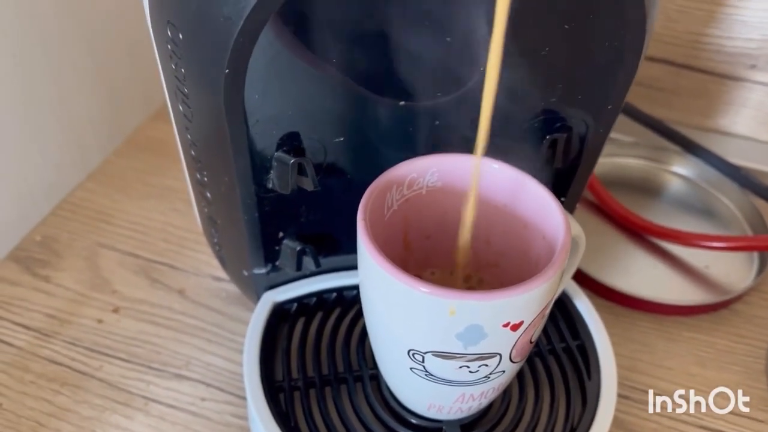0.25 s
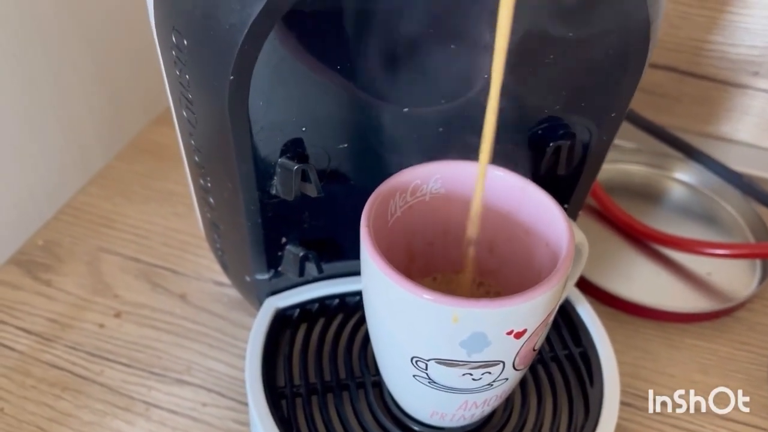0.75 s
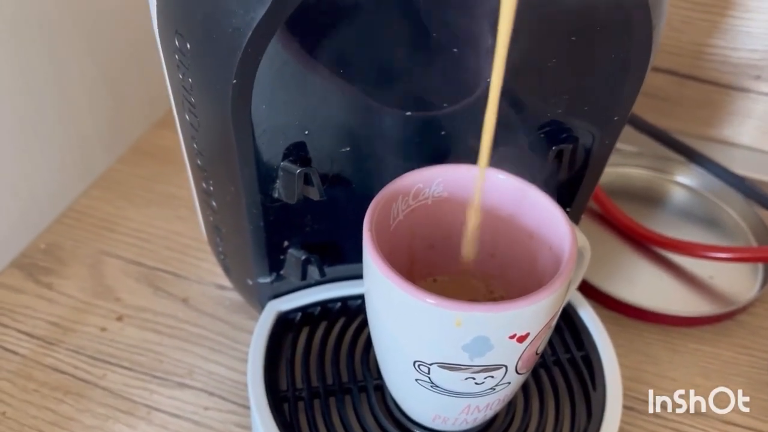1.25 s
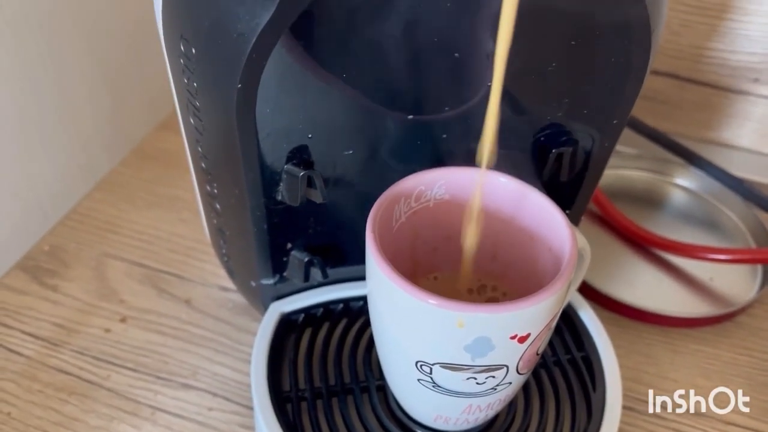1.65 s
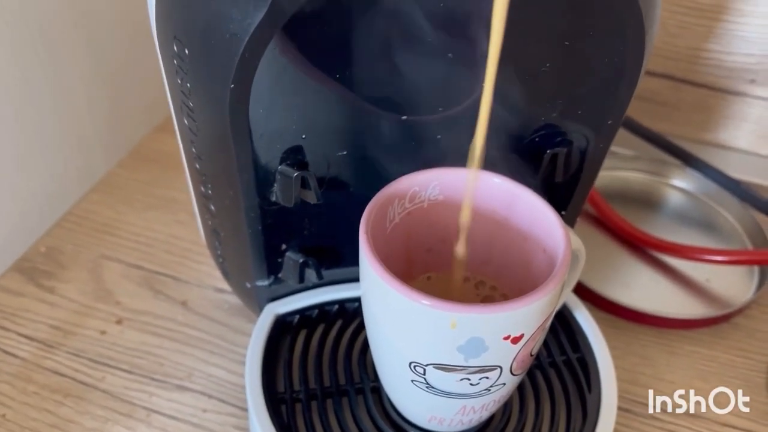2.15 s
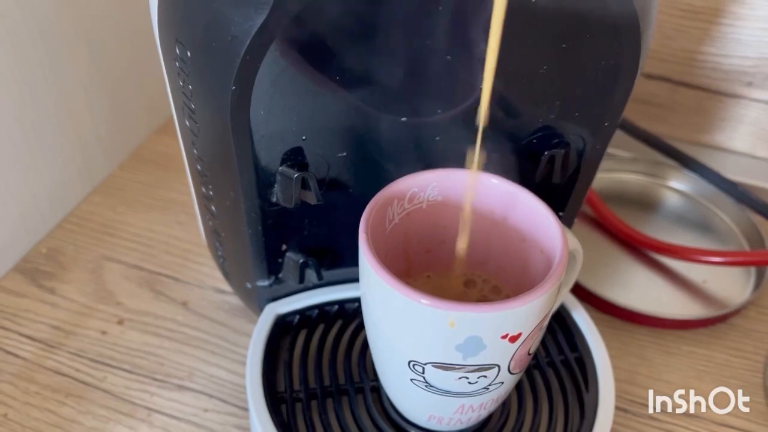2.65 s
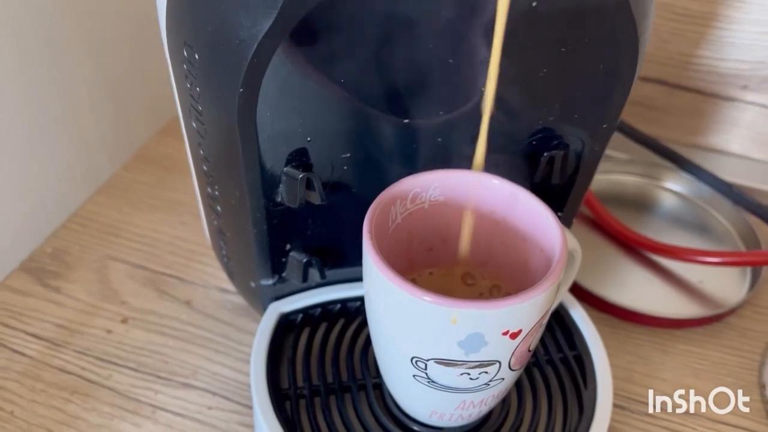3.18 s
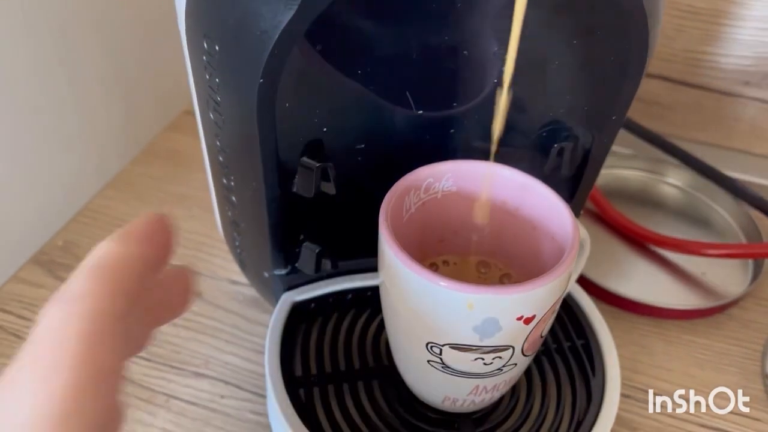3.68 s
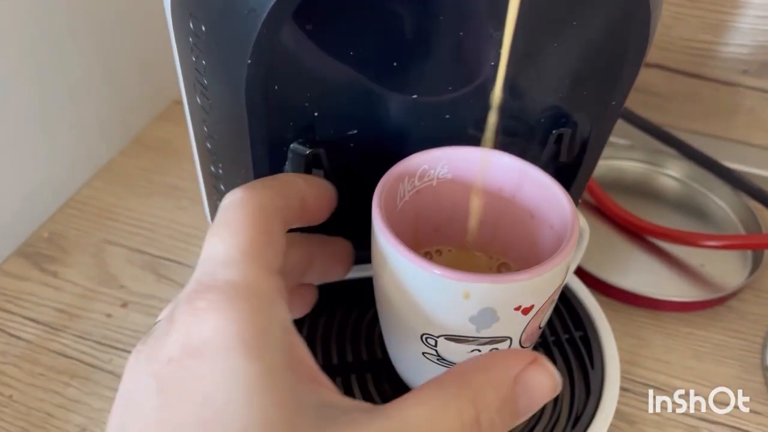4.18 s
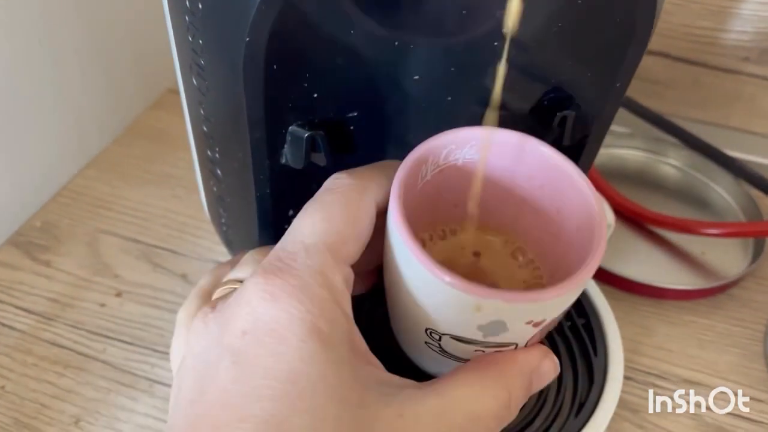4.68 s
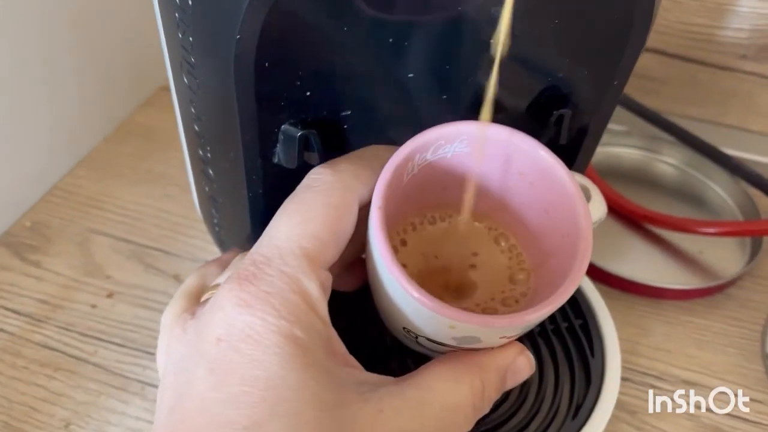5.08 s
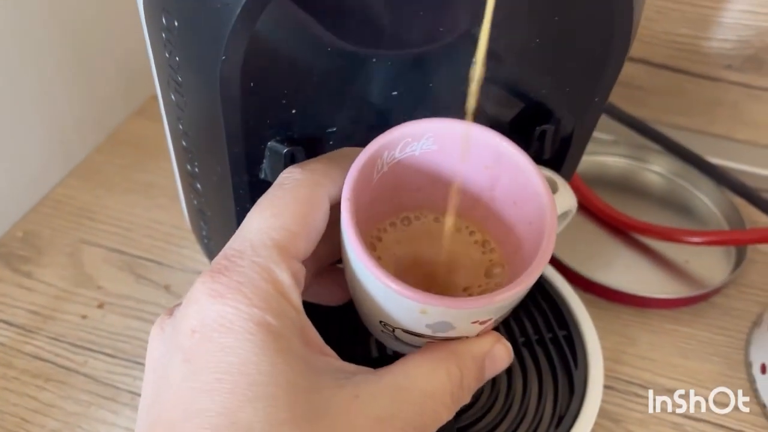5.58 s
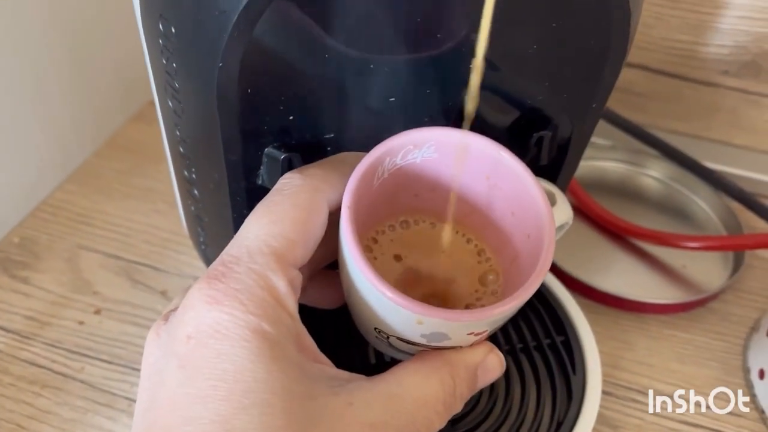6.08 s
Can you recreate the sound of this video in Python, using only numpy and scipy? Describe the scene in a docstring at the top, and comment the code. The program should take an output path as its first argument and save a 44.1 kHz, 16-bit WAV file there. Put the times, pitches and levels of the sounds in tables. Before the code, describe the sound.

A low, buzzing coffee pump runs for a second and a half, bubbles popping through it, then cuts off. Irregular hollow plops and fizz continue; a chattering valve knock lands near two seconds. Later a faint soft swish passes, a mug slides and thuds dully on its tray, and the drips die down. Close stereo microphone, short room echo.

```python
"""A capsule coffee machine fills a mug. A solenoid pump hums and rattles at mains rate until 1.54 s: harmonics
plus stroke-shaped noise. Bubbles burst at the spout throughout, kicks into resonances, over rumble and fizz;
after the pump stops, small bubbles and froth join them. A valve knocks near 2 s, slugs of coffee rock the tray,
a soft swish peaks at 3.2 s, and from 4.6 s a hand shifts the mug: noise scrapes and decaying sine bumps.
A small room answers, heard through two microphone ports."""
import sys
import numpy as np
from scipy import signal
from scipy.fft import rfft, irfft, next_fast_len
from scipy.io import wavfile
from scipy.ndimage import map_coordinates

SR = 44100
rng = np.random.default_rng(int(sys.argv[2]) if len(sys.argv) > 2 else 0)


def output_pcm(signal):
    """Save a mono or channel-first signal as 16-bit PCM at the path in sys.argv[1].

    Samples are clipped to [-1, 1] before scaling.
    """
    pcm = np.clip(np.atleast_2d(signal).T, -1, 1) * 32767
    wavfile.write(sys.argv[1], SR, np.round(pcm).astype(np.int16))


N = 279579
TIME_S = np.arange(N) / SR


def amp(db):
    """Decibels to gain."""
    return 10 ** (np.asarray(db) / 20)


def unit(x):
    """Scale to rms 1."""
    return x / np.sqrt(np.mean(x ** 2) + 1e-20)


def noise():
    """White noise for the whole scene."""
    return rng.standard_normal(N)


def along(points, hz):
    """Interpolate (Hz, value) points on a log frequency axis."""
    f, v = np.transpose(points)
    return np.interp(np.log(hz + 1), np.log(f + 1), v)


def curves(rows):
    """One value per sample for each column after the time."""
    s, *columns = np.transpose(rows)
    return [np.interp(TIME_S, s, column) for column in columns]


def wobble(rate_hz):
    """A smooth random curve with rate_hz knots a second."""
    steps = np.arange(0, N + 64, 64)
    knots = rng.standard_normal(int(N * rate_hz / SR) + 4)
    return np.interp(np.arange(N), steps, map_coordinates(knots, [steps * rate_hz / SR]))


def filtered(x, response):
    """x times a complex response of frequency."""
    n = x.shape[-1]
    m = next_fast_len(n + min(n // 2, SR // 10), True)
    return irfft(rfft(x, m) * response(np.fft.rfftfreq(m, 1 / SR)), m)[..., :n]


def coloured(x, spectrum):
    """x shaped by (Hz, dB) points, at rms 1."""
    return unit(filtered(x, lambda hz: amp(along(spectrum, hz))))


def resonate(x, modes):
    """x through parallel causal resonances of alternating sign, at rms 1."""
    def response(hz):
        total = 0
        for k, (centre_hz, width_hz, db) in enumerate(modes):
            damping = 1j * hz * width_hz
            total = total + (-1) ** k * amp(db) * damping / (centre_hz ** 2 - hz ** 2 + damping)
        return total
    return unit(filtered(x, response))


def add(track, s, sound):
    """Mix a sound into the track at time s."""
    part = track[max(round(s * SR), 0):][:len(sound)]
    part += sound[:len(part)]


def grains(rate_hz, spread_db):
    """Random clicks, rate_hz a second, a few much larger than the rest."""
    size = np.minimum(rng.standard_normal(N), 2.3)
    return (rng.random(N) < rate_hz / SR) * rng.choice([-1, 1], N) * amp(spread_db * size)


def swell(s, attack_s, hold_s, release_s, db):
    """A gain that rises 20 dB per attack up to time s and falls 20 dB per release from s + hold."""
    t = TIME_S - s
    return amp(db - 20 * (np.maximum(-t, 0) / attack_s + np.maximum(t - hold_s, 0) / release_s))


# Quiet kitchen spectrum. Each row: frequency in Hz, relative level in dB.
AIR_SPECTRUM = [(25, 0.5), (60, 13), (125, 12), (175, 13), (230, 7), (360, -4.5), (550, -24.5),
                (1000, -37.5), (1700, -24.5), (3000, -18.5)]


def kitchen_air():
    """Steady noise, nearly all of it low."""
    return amp(-67.5) * coloured(noise(), AIR_SPECTRUM)


MAINS_HZ, FIRST_STROKE_S, PUMP_OFF_S = 50, .019, 1.538
PERIOD_S = 1 / MAINS_HZ
TURNS = (TIME_S - FIRST_STROKE_S) * MAINS_HZ
CYCLE = TURNS[:SR // MAINS_HZ]  # one stroke, in turns
SINCE_S = CYCLE % 1 * PERIOD_S  # time since the stroke

# Hum partials. Each row: multiple of the stroke rate, relative level in dB.
HUM_PARTIALS = [(1, -3), (2, 1.5), (3, -14), (4, -14), (5, 2), (6, -6.5), (7, 1), (8, -6.5), (9, -21),
                (11, -17.5), (13, -21.5), (14, -24.5), (15, -18.5), (16, -19.5), (17, -18), (18, -13.5),
                (19, -22.5), (20, -12), (21, -16), (22, -17), (24, -16.5), (25, -17.5), (26, -20),
                (27, -18)]
# Case smears the low partials most. Each row: frequency in Hz, phase scatter factor in radians.
PHASE_SMEAR = [(400, 4.44), (550, 1.34), (1400, 1)]
# The piston's first blow in the cycle, then the second: delay after it and strength.
STRIKE_S, REBOUND_S, REBOUND_GAIN = 0.001033, .0047, 0.99


def hum():
    """Two blows per cycle set the partials going; paths through the case smear their phases."""
    shape = 0
    for k, db in HUM_PARTIALS:
        hz = k * MAINS_HZ
        two_blows = 1 + REBOUND_GAIN * np.exp(-2j * np.pi * hz * REBOUND_S)
        lead = np.angle(two_blows) - 2 * np.pi * hz * STRIKE_S
        smear = along(PHASE_SMEAR, hz) * rng.uniform(-1.1, 1)
        shape = shape + amp(db) * np.cos(2 * np.pi * k * CYCLE + lead + smear)
    return np.resize(unit(shape), N) * amp(0.57 * wobble(3))


# Half-order lines. Each row: multiple of the stroke rate, relative level in dB.
HALF_ORDERS = [(3.5, -3), (4.5, 3), (5.5, 0)]


def half_orders():
    """Alternate strokes differ slightly, which puts faint lines between the harmonics."""
    return sum(amp(db + 4.5 * wobble(8.5)) * np.sin(2 * np.pi * k * TURNS) for k, db in HALF_ORDERS)


# Water in the pump. Each row: frequency in Hz, relative level in dB.
CHURN_SPECTRUM = [(40, -29), (80, 0), (130, -16), (170, -12), (220, -16), (380, -10), (480, -14.5),
                  (900, -57)]


def churn():
    """Water churns in the pump as low noise."""
    return coloured(noise(), CHURN_SPECTRUM)


def blows():
    """The piston hits its stop, then springs back a few milliseconds later: one cycle's envelope."""
    spring_back = 0.14 * np.exp(-((SINCE_S - .004) % PERIOD_S) / 0.0075)
    return np.exp(-SINCE_S / 0.0056) + spring_back + 0.36


# Tight panels. Each row: frequency in Hz, relative level in dB.
BUZZ_SPECTRUM = [(1200, -31), (1600, 7.5), (1850, 1.5), (2100, -6), (2400, -2), (3200, -10), (4400, -8),
                 (6000, -9.5), (8300, -21), (12000, -16), (16000, -26)]


def panel_buzz():
    """Tight panels repeat the same noise on every stroke, with a wavering level."""
    stroke = rng.standard_normal(len(CYCLE)) * blows()
    return coloured(np.resize(stroke, N), BUZZ_SPECTRUM) * amp(1.6 * wobble(40.06))


# Case shaken by the piston. Each row: frequency in Hz, relative level in dB.
RATTLE_SPECTRUM = [(450, -11), (600, -5), (800, -10), (1040, 3.5), (1170, -2), (1300, 1), (1800, 2),
                   (2100, -16), (2500, -10), (3200, -22), (4400, -24.5), (7000, -19), (12000, -28),
                   (15500, -41)]
# Air passing through the pump. Each row: time in seconds, rattle rise in dB, half length in seconds.
GURGLES = [(0.238, 0, 0.014), (0.606, 2.5, 0.043), (0.8, 2.5, 0.0105), (0.985, 1, 0.018), (1.29, 0, 0.016)]


def case_rattle():
    """Loose panels rattle anew on each stroke, louder as air passes through the pump."""
    gurgle_db = sum(db * np.exp(-((TIME_S - s) / half_s) ** 2) for s, db, half_s in GURGLES)
    strokes = noise() * np.resize(blows(), N) * amp(2.5 * wobble(50))
    return coloured(strokes, RATTLE_SPECTRUM) * amp(gurgle_db)


# Squirted water. Each row: frequency in Hz, relative level in dB.
SQUIRT_SPECTRUM = [(2000, 7), (3600, 6), (4400, 16), (5100, -7), (5800, 18), (6100, 2), (7000, 7),
                   (8300, -12.5), (10000, -4), (13500, 9), (16000, -11)]
# Sizzling grains. Each row: frequency in Hz, relative level in dB.
SIZZLE_SPECTRUM = [(2000, -35), (6000, 5), (10000, 4), (14000, -11), (16000, -20)]


def flow_hiss():
    """Each stroke squirts a pulse of noise; random grains sizzle over it."""
    pulse = np.exp(-(((SINCE_S + 0.0018) % PERIOD_S - .002) / 0.0018) ** 2)
    squirt = coloured(np.resize(0.32 + pulse, N) * noise(), SQUIRT_SPECTRUM)
    return squirt + 0.5 * coloured(grains(rate_hz=330, spread_db=15), SIZZLE_SPECTRUM)


# Pump levels before mix trims. Each row: time in seconds, rattle in dB, flow hiss in dB.
PUMP_LEVELS = [(0.0, -40.5, -49.5), (1.032, -40.5, -48), (1.34, -40.5, -53), (1.398, -39.5, -49),
               (1.5, -41.5, -52)]
# Swing on rubber mounts. Each row: frequency in Hz, level in dB, t60 in seconds.
MOUNTS = [(69.8, -35.5, 0.5), (96.4, -32, .4)]


def pump():
    """The piston strikes each mains cycle; at cut-out the pump swings out on its rubber mounts."""
    rattle_db, hiss_db = curves(PUMP_LEVELS)
    low = amp(-28.5) * hum() + amp(-47.5) * churn() + amp(-51.0) * half_orders()
    high = amp(rattle_db - 5.5) * case_rattle() + amp(rattle_db - 10.5) * panel_buzz()
    high = high + amp(hiss_db - 6.0) * flow_hiss()
    stopped_s = np.maximum(TIME_S - PUMP_OFF_S, 0)
    swing = sum(amp(db - 60 * stopped_s / t60_s) * np.sin(2 * np.pi * hz * stopped_s)
                for hz, db, t60_s in MOUNTS)
    return swing + low * amp(-60 * stopped_s / 0.091) + high * amp(-60 * stopped_s / 0.049)


# Big bubbles bursting at the spout. Each row: time in seconds, pitch in Hz, level in dB,
# then, relative to it and before trims, case ring in dB, hollow ring in dB, spit in dB.
BIG_BUBBLES = [(0.111, 1460.0, -33, -20, -5, -17), (0.2126, 1280, -24.5, -3, -8, -27.5),
               (0.238, 1380.0, -35.5, -8, -8, -10), (0.263, 1330.0, -34, -12.0, -14, -9),
               (0.317, 2260.0, -45, -9, -10.0, -1), (0.343, 1380.0, -36, -10, -12, -10),
               (0.575, 1360.0, -31, -11.0, -13, -29), (0.604, 2410, -41, -3, -8, -3),
               (0.786, 1830.0, -40, -9, -13, -5.0), (0.8, 1430.0, -34.5, 1.5, -13, -19),
               (0.856, 1540.0, -36, 0.0, -10.0, -7), (0.869, 2400.0, -47.0, 4, -10.0, 11.0),
               (0.9614, 1430, -27.0, -7, -5, -27.0), (0.9816, 1550.0, -38, -2.5, -8, -18.0),
               (1.004, 1450.0, -36.5, -4.5, -13, -8), (1.0382, 1400.0, -29, -7, -12, -22),
               (1.047, 1490.0, -33.0, -5.0, -8, -20.5), (1.1705, 1410.0, -34.5, -7, -14, -17),
               (1.2199, 1390.0, -30.5, -2, -10.0, -14.5), (1.291, 1550.0, -37, -11, -10.0, -5.5),
               (1.31, 1600.0, -35, -0.5, -12, -21), (1.3265, 1420.0, -39.5, -10.5, -12, 1.5),
               (1.382, 1590.0, -44, 2, -7, -7.0), (1.4384, 1580.0, -31, -9.5, -6, -11.5),
               (1.568, 1690.0, -37, -7.5, -5, -12), (1.592, 1380.0, -43, 2.5, 1, -12.5),
               (1.6037, 1780.0, -37, -8.5, -9, -5.5), (1.6202, 1840.0, -44, -18.0, -5, -9),
               (1.6333, 1680, -44.5, -5.5, -3, -19), (1.658, 1740, -45.5, -0.5, 0, -1),
               (1.68, 1550, -29.5, 5.0, -4.5, -13.5), (1.697, 1360.0, -38, 1.0, -1, -24),
               (1.7188, 1390.0, -44, 1, -3, -4.5), (1.7349, 1530.0, -33, -2, -5, -27),
               (1.7441, 2390, -41, -8, -10, 1), (1.7587, 1610.0, -40.5, -3.5, -1, 1),
               (1.7808, 1430, -31.5, -5.5, -8, -35), (1.7999, 1850, -34.5, -2.5, -9.0, -19.0),
               (1.8276, 1650.0, -39, -13.5, -16, -28), (1.8405, 1570, -19.5, -2.5, -15.5, -19.5),
               (1.8673, 2290, -47, -8, -10, -3), (1.8813, 1510.0, -44.5, 7.5, -2, -16),
               (1.9253, 1580.0, -51, 4, 0, -20), (2.039, 1670.0, -33, -3, -10.0, -18),
               (2.0805, 1710, -40.5, -7.5, -12, -13), (2.1023, 1420.0, -35.5, 1.5, -11, -20.5),
               (2.1393, 1550, -33.5, -9.5, -11, -11.5), (2.161, 1450.0, -39.5, -13, -13, -9),
               (2.1879, 1600.0, -33.5, -2, -10, -25), (2.223, 1410.0, -53, 5.5, 5, -15),
               (2.2455, 1490, -49, -4.5, 0, -11), (2.2671, 1406, -36, 4.5, 3.5, -30),
               (2.3135, 1550, -37.5, -1.5, -5.5, -21), (2.3235, 2310, -43.5, -5, -4, -10),
               (2.358, 1560.0, -45, -1, 3, -24), (2.4116, 1560.0, -39.5, -4, -6, -22),
               (2.4274, 1420.0, -39, -6.5, -9, -30), (2.485, 1540, -23.5, -9.0, -23, -17.5),
               (2.4946, 1600, -28.5, -11, -16, -15), (2.5212, 1950.0, -50.5, 1, -0.5, 2.5),
               (2.5702, 1560.0, -40, -1, -5.5, -17), (2.6045, 1640, -47.5, -5.5, -2, -8),
               (2.6258, 1530.0, -32, -7.5, -23, -20), (2.6595, 2040, -53, -16.5, -8.5, -14),
               (2.695, 1670, -40.5, -3, -5.5, -18), (2.7475, 1430.0, -53.5, -1.5, -4, -2),
               (2.7599, 1570.0, -43, -0.5, -3.5, -17.5), (2.824, 1590.0, -45, -5.5, -12, -16.5),
               (2.8393, 1600.0, -40.0, -7.0, -14, -24), (2.8797, 1530, -44, -13.5, -18, -4.5),
               (2.9007, 1480.0, -43.5, -1, 1.0, -10.5), (2.9378, 1530.0, -44.5, -4, -4, -27.5),
               (2.9646, 1370, -32.5, -8, -15.5, -23), (3.0146, 1690.0, -53, -4.0, -7, -7),
               (3.0465, 1540.0, -39, -3, -9, -17), (3.0608, 1600.0, -37, -3, -8.5, -9.5),
               (3.0915, 1440, -34.5, -8, -8, -15.5), (3.1092, 1600, -37, -6, -8, -11.5),
               (3.1456, 1530.0, -49.5, -6.5, -21, -21), (3.179, 1470.0, -53, 1, -4, -23),
               (3.2006, 1390, -46, -6, -10.5, -10), (3.261, 1470.0, -43, 2, -1.0, -7),
               (3.304, 2220, -42, -8.5, -8, -0.5), (3.353, 1420.0, -36.5, -17.0, -32, -25),
               (3.379, 1500.0, -44, -5.0, -17.0, -22), (3.4162, 1500.0, -51.5, -12.5, -5, -20),
               (3.475, 1440.0, -35, -5.5, -12, -24.5), (3.512, 1480.0, -43, -8, -3.5, -12),
               (3.5284, 1550, -42, -4.5, -6.5, -3), (3.5395, 1570.0, -47.5, -1.0, 5, -5),
               (3.5862, 1540, -40, -1, -10, -11.5), (3.6109, 1480.0, -44.5, -9, -9, -27),
               (3.6386, 1660.0, -49.5, -16.0, -14, -15), (3.6805, 1520.0, -44.5, -8.5, -16, -22.5),
               (3.702, 1700, -47.5, -9, -15, -16), (3.7433, 1440.0, -47.5, -8.5, -11, -28),
               (3.7878, 1440, -44, -9.0, -18, -20), (3.8255, 1500.0, -37, -10.0, -20.0, -8),
               (3.84, 1520.0, -40.5, -10, -13.5, -20.0), (3.8832, 1360.0, -44, -6.5, -6, -9),
               (3.8997, 2200.0, -37.5, -2.5, -3, -7.0), (3.9224, 1850, -28.5, -11, -18, -14),
               (3.9387, 1530.0, -37.5, -4.5, -2.5, -25), (3.9517, 1590.0, -44, -10.5, -2, -16),
               (4.0039, 1690, -43.5, -14.5, -12, -8), (4.0258, 1550.0, -46.5, -12, -22.0, -23.0),
               (4.0766, 1880, -45.5, -18.5, -4, -9), (4.0931, 1510.0, -43, -4.5, -5.0, -17),
               (4.113, 1490.0, -47, -7, -17.0, -25), (4.1451, 1530, -27.0, -12, -18, -15.5),
               (4.1643, 1420.0, -37.5, -5, -9.5, -13), (4.2187, 1410.0, -47, 0.0, -1, -25.0),
               (4.236, 1490, -38.5, -4.5, -2.0, -11.5), (4.2545, 1640, -34, -12.5, -24, -9),
               (4.2733, 1400.0, -41.5, -1.0, -1, -20), (4.2986, 1510.0, -45, -7, -16, -10),
               (4.337, 1520.0, -54, -10.5, -9.0, -4), (4.362, 1374, -37.5, -6.5, -22, -31.5),
               (4.3822, 1400.0, -50, -3, -17.0, -7), (4.42, 1540.0, -43.0, -1, -1, -24),
               (4.444, 1540.0, -48, -5.0, -13, -24), (4.4791, 1530.0, -45, -6, -11, -22.5),
               (4.496, 1510.0, -50, -6.5, -7, -9), (4.506, 1510, -53.5, -9.5, -8, -13.5),
               (4.5937, 1630.0, -50, -0.5, 6, -14.5), (4.6606, 1400.0, -47.5, 0.5, -2, -15.0),
               (4.7124, 1530.0, -52, 0, 2.5, -15), (4.786, 1520.0, -51.5, -2.5, 3, -20),
               (4.8016, 1380.0, -41, -6, -8, -9), (4.8136, 1600.0, -40.5, -10, -1.5, -16),
               (4.855, 1540.0, -46, -5.5, -1, -30), (4.8702, 1560.0, -41.5, -3.5, -5, -34),
               (4.9039, 1360.0, -46.0, -6, 3, -12), (4.9388, 1410.0, -40, -10, -18, -14),
               (4.9933, 1590.0, -43.5, -9.5, -6, -14), (5.0108, 1560.0, -42, -4.5, -10, -10.5),
               (5.0245, 1650, -48, -8.5, -6, -20), (5.0506, 1570.0, -47.5, -6, -4, -20.5),
               (5.0714, 1450, -46, -5, -5, -11), (5.0824, 1440.0, -42.0, -6.0, -13, -18),
               (5.1332, 1600, -36.5, -4.5, -5.5, -21.5), (5.2058, 1557, -51.5, -11.5, -19, -4),
               (5.2198, 1380.0, -39.5, -5.5, -6.5, -25), (5.261, 1600.0, -50.5, -3, -7.5, -19),
               (5.2742, 1560.0, -45, -4.5, -3, -24.5), (5.2985, 1370.0, -47.5, -6.5, 0.5, -18),
               (5.331, 1570, -54.5, -12.5, 2, -10.0), (5.3576, 1410.0, -44.5, -8, -17, -14),
               (5.4173, 1490, -33.5, -9.0, -9, -6.5), (5.4438, 1450.0, -54, 2.5, 5.5, -5),
               (5.5286, 1390, -48, -12, -18.5, -17.5), (5.544, 1530, -51.0, -5.5, -7.5, -10.5),
               (5.564, 1460, -50.5, -10.0, -10, -16.0), (5.5925, 1360.0, -50.5, -6, 2.5, -14),
               (5.6056, 1380, -44, -4, 2, -11.5), (5.6519, 1550.0, -57.5, -1.5, 6, -16.5),
               (5.6646, 1370.0, -46, -2, -1.5, -26), (5.7147, 1400, -57.5, -5.5, -5, -15),
               (5.7332, 1400.0, -54.5, -9.0, 1.5, -14.5), (5.854, 1670, -46.5, -8.5, -11.5, -14),
               (5.868, 1450.0, -36, -11, -14.5, -22), (5.88, 1457, -52.5, -8, 2, -23),
               (5.8923, 1460, -58.5, -2, -1.0, -16), (5.9105, 1440, -57, 1.0, 7, -1),
               (5.9726, 1520, -40.0, -7.5, -10, -8.5), (6.0537, 1560, -56, -7.5, -13.5, -16.5),
               (6.135, 1484, -46, -9, -11.5, -8.5), (6.169, 1514, -48.0, -4.0, -1.5, -7.0),
               (6.1897, 1384, -55.5, -5, -2.5, -7.5), (6.2507, 1604, -62, -6, -4.5, -8),
               (6.3014, 1378, -60.5, -12, -15, -10), (6.312, 1440, -67, -13.5, -10.5, 2.0)]
# Flow after the pump stops. Each row: time in seconds, froth level in dB before SMALL_DB.
FLOW_LEVELS = [(1.6, -46), (1.98, -47), (2.66, -62), (2.92, -46.5), (4.6, -60), (4.98, -58.5), (5.89, -72),
               (6.3, -81.5)]
SMALL_PER_S, SMALL_JITTER = 22, 0.45  # jitter as a share of the spacing
SMALL_WAIT_S, SMALL_HZ = 0.019, 1600  # pause around a big bubble; typical pitch
SMALL_DB, SMALL_SPREAD_DB = 4, -0.5  # level over the flow; its scatter
SMALL_CASE_DB, SMALL_SPIT_DB = -2.5, -20  # mean case and hollow rings, and spit, relative to the bubble


def bubbles():
    """Big bubbles plus small ones that follow the dying flow: rows as in BIG_BUBBLES."""
    chance = rng.standard_normal((200, 6))
    s = PUMP_OFF_S + (np.arange(len(chance)) + 1 + SMALL_JITTER * chance[:, 0]) / SMALL_PER_S
    db = np.interp(s, *np.transpose(FLOW_LEVELS)) + SMALL_DB + SMALL_SPREAD_DB * chance[:, 1]
    # a big burst uses up the froth around it
    apart_s = abs(s[:, None] - np.array(BIG_BUBBLES)[:, 0]).min(axis=1)
    db = db - 20 * np.maximum(1 - apart_s / SMALL_WAIT_S, 0)
    pitch_hz = SMALL_HZ * np.exp(0.14 * chance[:, 4])
    rings_db = SMALL_CASE_DB + 3 * chance[:, 2:4]
    spit_db = SMALL_SPIT_DB + 5 * chance[:, 5]
    small = np.column_stack([s, pitch_hz, db, rings_db, spit_db])
    return np.vstack([BIG_BUBBLES, small[s < N / SR]])


def surge(pops, delay_s, width_s):
    """Activity level in dB around the bursts after pump stop, spread over width_s."""
    power, lag_s = np.zeros(N), np.arange(-SR // 4, SR // 4) / SR
    crowd = np.exp(-abs(lag_s - delay_s) / width_s)
    for s, hz, db, case_db, *_ in pops:
        burst_power = amp(db) ** 2 + amp(db + case_db) ** 2
        add(power, s + lag_s[0], (s > PUMP_OFF_S) * burst_power * crowd)
    return 10 * np.log10(power + amp(-77.5) ** 2)


RUMBLE_SWELL_S = 0.019


def slow_surge(pops):
    """The slower surge in dB, relative to its mean after the pump stops."""
    slow_db = surge(pops, delay_s=0.017, width_s=RUMBLE_SWELL_S)
    return slow_db - slow_db[TIME_S > PUMP_OFF_S].mean()


LIFT_S, LIFT_TAKES_S, LIFT_DB = 4.9, 0.1014, -8  # the hand lifts the mug
RUMBLE_DB, RUMBLE_DB_PER_SURGE_DB = -59.5, 0.46


def tray_rumble(surge_db):
    """Low noise from the tray grows with the surges and drops as the hand lifts the mug."""
    lifted = np.clip((TIME_S - LIFT_S) / LIFT_TAKES_S, 0, 1)
    level_db = RUMBLE_DB + RUMBLE_DB_PER_SURGE_DB * surge_db + LIFT_DB * lifted
    spectrum = [(35, -26.5), (60, -3.5), (74, -3), (88, 2.5), (105, -7.5), (130, -17.5), (170, -11.5),
                (215, -14.5), (300, -17.0), (600, -72.5)]
    return amp(level_db) * coloured(noise(), spectrum)


# Foam fizz. Each row: frequency in Hz, relative level in dB.
FIZZ_SPECTRUM = [(100, -7), (200, -2.5), (300, -0.5), (600, -3), (2000, -6), (3500, -6.5), (7000, -5),
                 (8400, -14.5), (10000, -1.5), (13500, 2.5), (16000, -8.5)]
# Spit spray and fizz grains. Each row: frequency in Hz, relative level in dB.
SPIT_SPECTRUM = [(2400, -2.5), (2900, -4.5), (3250, -14), (4300, -8), (5200, -11), (7000, -11.5),
                 (8300, -11), (10000, -6), (13000, -6.5), (15500, -12.5)]
FIZZ_DB, FIZZ_FADE_DB_PER_S = -69, 1.27


def foam_fizz(surge_db):
    """Foam fizzes as noise and grains, fading after the pump stops and following the surges."""
    fade_db = FIZZ_FADE_DB_PER_S * np.maximum(TIME_S - PUMP_OFF_S, 0)
    level_db = FIZZ_DB - fade_db + 0.18 * surge_db + .8 * wobble(8.2)
    fizz = coloured(noise(), FIZZ_SPECTRUM) + coloured(grains(rate_hz=260, spread_db=4.5), SPIT_SPECTRUM)
    return amp(level_db) * fizz


# Gap under the spout. Each row: frequency in Hz, width in Hz, relative level in dB.
SPOUT_MODES = [(1207, 95, -5.5), (1420, 67, 3), (1560, 105, 8), (1726, 158, 1.5), (1905, 185, -2.5),
               (2220, 180, -6.5), (2522, 170, -6.5), (3550, 170, -18)]
# Wider gap once the mug is lifted. Each row: frequency in Hz, width in Hz, relative level in dB.
SPOUT_LIFTED_MODES = [(1233, 230, -3.5), (1420, 110, 0.5), (1690, 180, 5.5), (1920, 186, 0),
                      (2200, 100, -8), (2350, 130, -10), (3475, 163, -25)]
# Plastic case. Each row: frequency in Hz, width in Hz, relative level in dB.
CASE_MODES = [(563, 41, -15.5), (935.7, 67.5, -0.5), (1018.4, 64, 1.5)]
# Air in the recess behind the mug. Each row: frequency in Hz, width in Hz, relative level in dB.
HOLLOW_MODES = [(365, 34, 0)]
SPOUT_DB, CASE_DB, HOLLOW_DB, SPIT_DB = -16, -16, -15, -14.5  # trims
SNAP_GAIN, COLLAPSE_S, SPIT_S = 9.3, .0011, 0.0018  # clean snap against turbulent push; decay times
BUBBLE_WIDTH_HZ, SPLASH = 480, 0.41  # splash: push reaching the gap directly, beside the bubble's ring


def varied(modes, pitch):
    """Scale the pitches and scatter the levels of a set of modes."""
    return [(hz * pitch, width_hz, db + rng.normal(0, 2.7)) for hz, width_hz, db in modes]


def sputter(pops):
    """Each bubble snaps open at its pitch, spits, and rings the spout gap, case and hollow."""
    out, t = np.zeros(N), np.arange(SR // 10) / SR
    age = t - .008
    snap = SNAP_GAIN * (t == t[age >= 0][0])
    push = np.exp(-abs(age) / np.where(age < 0, 0.0003, COLLAPSE_S))
    push = push + 0.13 * np.exp(-abs(age) / np.where(age < 0, 0.004, 0.008))
    spray = np.exp(-abs(age) / np.where(age < 0, 0.0004, SPIT_S))
    spray = spray + 0.1 * (age > 0) * np.exp(-abs(age) / 0.007)
    splash_spectrum = [(700, -24.5), (1300, -2.5), (2700, 2), (5000, -14.5), (9000, -32.5)]
    for s, bubble_hz, level_db, case_db, hollow_db, spit_db in pops:
        gap_noise, case_noise, spit_noise = rng.standard_normal((3, len(t)))
        kick, pitch = snap + push * gap_noise, np.exp(0.022 * rng.standard_normal())
        plop = resonate(kick, [(bubble_hz, BUBBLE_WIDTH_HZ, 0)]) + SPLASH * coloured(kick, splash_spectrum)
        spout = resonate(plop, varied(SPOUT_LIFTED_MODES if s > LIFT_S else SPOUT_MODES, pitch))
        case = resonate(snap + push * case_noise, varied(CASE_MODES, pitch))
        hollow = resonate(resonate(snap, varied(HOLLOW_MODES, pitch)), [(361.4, 110, 0)])
        spit = coloured(spit_noise * spray, [(900, -23.5)] + list(SPIT_SPECTRUM))
        burst = amp(SPOUT_DB) * spout + amp(CASE_DB + case_db) * case
        burst = burst + amp(HOLLOW_DB + hollow_db) * hollow + amp(SPIT_DB + spit_db) * spit
        add(out, s + age[0], amp(level_db) * burst)
    return out


def froth(pops):
    """Tiny bubbles crowd around each burst after pump stop: ticks in spout and case, and a drone."""
    surge_db = surge(pops, delay_s=.008, width_s=0.0047)
    drone = resonate(resonate(grains(rate_hz=300, spread_db=5.0), [(378.0, 56, 0)]), [(350.7, 37, 0)])
    tiny = grains(rate_hz=340, spread_db=7.5)
    ticks = resonate(tiny, SPOUT_MODES) + 0.69 * resonate(tiny, CASE_MODES)
    return amp(0.59 * surge_db - 37.5) * drone + amp(0.72 * surge_db - 31.5) * ticks


# Valve contacts. Each row: time in seconds, clack in dB, thump in dB.
VALVE_CONTACTS = [(1.9712, -11, -44.5), (1.9744, -7.5, -30), (1.977, -6, -39), (1.983, -10.5, -36),
                  (1.9867, -13, -9.5), (2.042, -36, -33.5)]
# Hard clack. Each row: frequency in Hz, relative level in dB.
CLACK_SPECTRUM = [(35, -32), (100, -13.5), (200, -3.5), (330, 4), (520, -10.5), (660, -5), (780, -9),
                  (950, 0), (1150, -8), (1400, -5), (2400, -9), (4200, -15.5), (5500, -23.5), (8000, -24.5),
                  (13000, -22.5), (15500, -33)]
# Booming case. Each row: frequency in Hz, relative level in dB, t60 in seconds.
THUMP_MODES = [(92, -15.5, 0.17), (169.8, -1, 0.12), (230.3, -24.5, 0.63), (340, -12.5, 0.061),
               (447, -17.5, 0.052), (662, -20.5, 0.099), (1386, -25.5, .16), (1740, -30.5, .13),
               (2420, -26, .15)]
# Ringing metal parts. Each row: frequency in Hz, relative level in dB.
SPRING_SPECTRUM = [(40, -20), (150, -1), (400, -0.5), (750, -7), (1500, -5.5), (2500, -1), (3000, 0),
                   (4200, 1.5), (5600, -2.5), (7000, -8.5), (9000, -23.5), (15000, -30.5)]
CONTACT_T60_S, WALLS_DB, WALLS_T60_S = 0.016, -16, 0.096  # the plastic walls ring on more softly
SPRING_DB, SPRING_T60_S = -33.5, 0.2


def valve():
    """Hard contacts chatter as noise bursts; the case booms and the spring rings after them."""
    out, t = np.zeros(N), np.arange(SR // 2) / SR
    boom = sum(amp(db - 60 * t / t60_s) * np.sin(2 * np.pi * hz * t) for hz, db, t60_s in THUMP_MODES)
    boom = boom * (1 - np.exp(-t / 0.0032))
    contact = amp(-60 * t / CONTACT_T60_S) + amp(WALLS_DB - 60 * t / WALLS_T60_S)
    contact = contact * (1 - np.exp(-t / 0.00017))
    for s, clack_db, thump_db in VALVE_CONTACTS:
        plastic = coloured(rng.standard_normal(len(t)), CLACK_SPECTRUM)
        add(out, s, amp(clack_db) * contact * plastic + amp(thump_db) * boom)
    spring = coloured(rng.standard_normal(len(t)), SPRING_SPECTRUM)
    add(out, VALVE_CONTACTS[1][0], amp(SPRING_DB - 60 * t / SPRING_T60_S) * spring)
    return out


# Slugs of coffee. Each row: time in seconds, relative level in dB.
SLUGS = [(2.114, -36.5), (2.304, -43.5), (2.388, -44), (2.461, -56.5), (2.523, -52), (2.599, -52),
         (2.792, -46), (2.868, -50.5), (3.0, -43.5), (3.127, -52), (3.206, -48.5), (3.33, -55), (3.39, -57),
         (3.455, -55), (3.552, -49), (3.615, -51), (3.976, -43), (4.18, -61), (4.26, -51), (4.462, -52),
         (4.525, -51), (5.637, -53)]
TRAY_HZ, SLUG_RISE_S = 83.2, 0.0221  # centre of the scattered rocking pitch


def slugs():
    """Thicker slugs of coffee land in the mug and rock the tray: short low sine swells."""
    out, t = np.zeros(N), np.arange(SR // 4) / SR
    rock = (t / SLUG_RISE_S * np.exp(1 - t / SLUG_RISE_S)) ** 2
    for s, db in SLUGS:
        hz = TRAY_HZ * np.exp(0.088 * rng.standard_normal())
        add(out, s - SLUG_RISE_S, amp(db - 1.0) * rock * np.sin(2 * np.pi * hz * t))
    return out


# Soft swish. Each row: frequency in Hz, relative level in dB.
PUFF_SPECTRUM = [(60, -3), (170, 26), (260, 3), (500, 3), (2500, -1.5), (6000, -3), (9000, -7), (15000, -9)]
# Swish gain: attack in seconds, hold in seconds, release in seconds, nominal level in dB.
PUFF_SWELL = (0.1, -0.05, 0.37, -53.5)
PUFF_S = 3.23


def puff():
    """A brief soft swish of swelling noise."""
    return swell(PUFF_S, *PUFF_SWELL) * coloured(noise(), PUFF_SPECTRUM)


# Mug on the tray: attack in seconds, hold in seconds, release in seconds, level in dB.
SLIDE_SWELL = (0.03, 0, 0.2, -52)
# Scrape. Each row: frequency in Hz, relative level in dB.
SCRAPE_SPECTRUM = [(60, -7), (200, -6), (350, -1.5), (550, -18.5), (800, -19), (1100, -15.5), (2500, -33),
                   (4000, -39.5), (12000, -58)]
SLIDE_S = 4.59  # peak of the slide


def mug_scrape():
    """The mug scrapes over the drip tray as dense grains, until it is lifted."""
    on_tray = np.clip(1 - (TIME_S - LIFT_S) / LIFT_TAKES_S, 0, 1)
    scrape = coloured(grains(rate_hz=1800, spread_db=2.5), SCRAPE_SPECTRUM) * amp(2 * wobble(25))
    return on_tray * swell(SLIDE_S, *SLIDE_SWELL) * scrape


# Mug bumps over the tray. Each row: time in seconds, relative level in dB, pitch in Hz.
BUMPS = [(4.6, -34.5, 228), (4.655, -47, 290), (4.679, -36.5, 211), (4.701, -34.5, 89.5), (4.745, -44, 208),
         (4.772, -61, 243), (4.843, -40, 76.4), (4.836, -37, 190), (4.872, -42, 201), (4.883, -44.5, 84),
         (4.92, -45.5, 205), (5.597, -49.5, 252), (5.615, -49, 95)]


def mug_bumps():
    """Dull bumps of the mug: decaying sines."""
    out, t = np.zeros(N), np.arange(SR // 5) / SR
    for s, db, hz in BUMPS:
        ring = np.sin(2 * np.pi * hz * t) * (1 - np.exp(-t / 0.003))
        add(out, s, amp(db + 1.0 - 60 * t / 0.15) * ring)
    return out


def counter(x, decay_s):
    """Worktop and wall scatter the treble back within milliseconds, differently at each port."""
    t = np.arange(SR // 25) / SR
    scatter = rng.standard_normal((2, len(t))) * np.exp(-t / decay_s)
    echo = filtered(scatter, lambda hz: 1 - 1 / (1 + (hz / 600) ** 4))
    return signal.oaconvolve(x[None], echo / np.linalg.norm(echo[0]), axes=1)[:, :N]


# Kitchen decay. Each row: frequency in Hz, t60 in seconds.
KITCHEN_T60 = [(100, 0.37), (300, 0.34), (1500, 0.22), (5000, 0.058), (12000, 0.075)]


def room(x):
    """The kitchen's noise tail, different at each port; treble dies sooner than bass."""
    hz, t, z = signal.stft(rng.standard_normal((2, SR // 2)), SR, nperseg=256)
    decay = amp(-60 * t / along(KITCHEN_T60, hz)[:, None])
    tail = signal.istft(z * (hz > 0)[:, None] * decay, SR, nperseg=256)[1]
    delayed = np.pad(x, (SR // 200, 0))
    return signal.fftconvolve(delayed[None], tail / np.linalg.norm(tail[0]), axes=1)[:, :N]


# Port phase. Each row: frequency in Hz, left lead in radians.
PORT_PHASE = [(60, .1), (130, .4), (270, .55), (500, .5), (1000, .45), (1290, .1), (1470, 1.5), (1540, 3.1),
              (1640, 3.5), (1700, 6.2), (2760, 7.1), (4500, 6.8), (5200, 5.1), (6400, 5.1), (8400, 3.1),
              (11000, .4), (13200, -1.2), (15000, -2.8)]
# Port tilt. Each row: frequency in Hz, left minus right in dB.
PORT_TILT = [(100, .3), (200, 1.5), (260, 5.3), (370, 5), (500, 0), (750, 1), (920, 5), (1020, 2.5),
             (1160, 6), (1400, 4), (1500, 0), (1700, 1.5), (2000, 1.5), (2500, 2.5), (5000, 3.5), (7500, 0)]


def ports(x):
    """Sound reaches the two ports with different phase and strength."""
    side = np.array([[.5], [-.5]])

    def response(hz):
        return amp(side * along(PORT_TILT, hz)) * np.exp(1j * side * along(PORT_PHASE, hz))
    return filtered(x, response)


def scene():
    """The machine close by, with a little of the room."""
    pops = bubbles()
    surge_db = slow_surge(pops)
    air, motor, knock = kitchen_air(), pump(), valve()
    drips = tray_rumble(surge_db) + foam_fizz(surge_db) + sputter(pops) + froth(pops)
    drips = drips + slugs() + puff() + mug_scrape() + mug_bumps()
    direct = ports(motor + knock + air + drips)
    scattered = amp(-5) * counter(motor, decay_s=0.0048) + amp(-8.5) * counter(drips, decay_s=0.0094)
    scattered = scattered + amp(-11.5) * counter(knock, decay_s=0.00098)
    return direct + scattered + room(amp(-22.5) * motor + amp(-16.0) * drips + amp(-15.0) * knock)


TOP_HZ = 16300


def record(dry):
    """Round off the highest peaks, then cut steeply above TOP_HZ."""
    limited = dry / (1 + abs(dry / .9) ** 6) ** (1 / 6)
    return filtered(limited, lambda hz: 1 / (1 + (hz / TOP_HZ) ** 80))


dry = scene()
out = record(dry)
output_pcm(out)
```